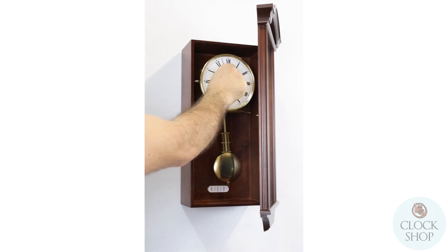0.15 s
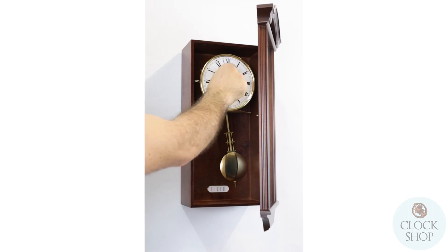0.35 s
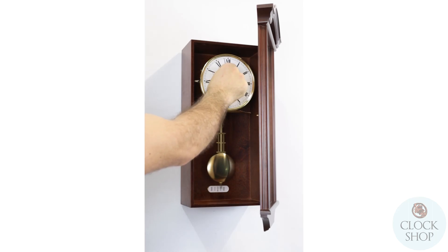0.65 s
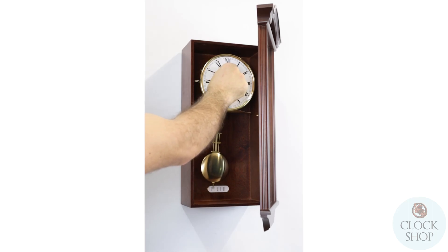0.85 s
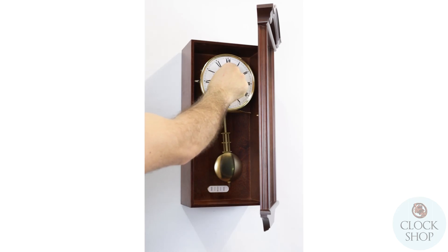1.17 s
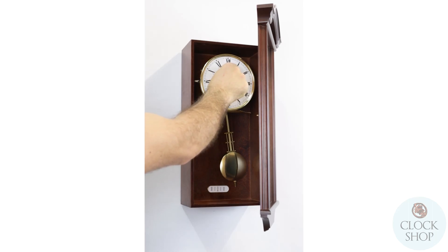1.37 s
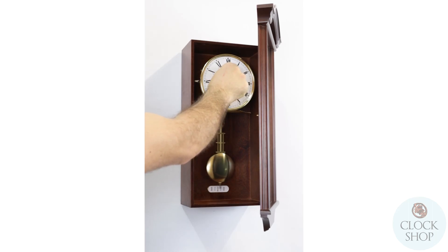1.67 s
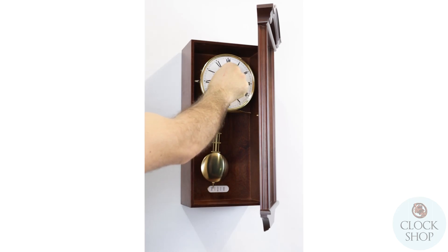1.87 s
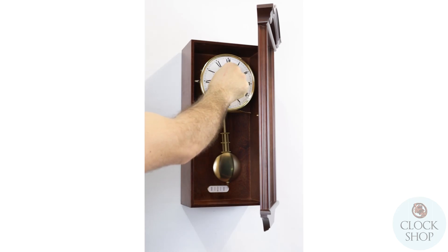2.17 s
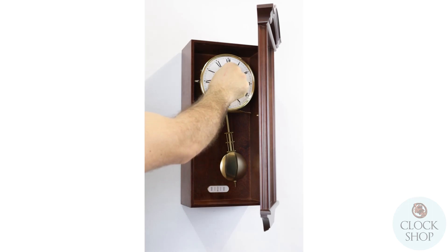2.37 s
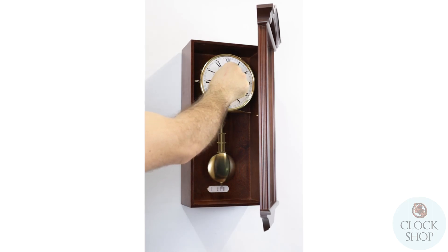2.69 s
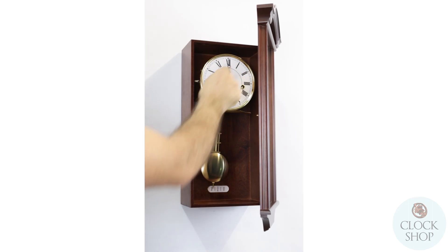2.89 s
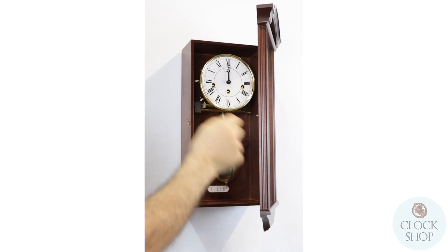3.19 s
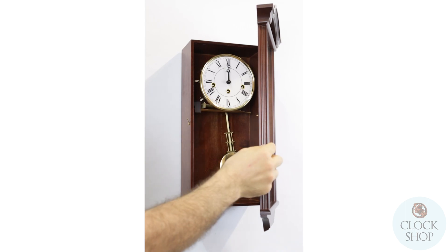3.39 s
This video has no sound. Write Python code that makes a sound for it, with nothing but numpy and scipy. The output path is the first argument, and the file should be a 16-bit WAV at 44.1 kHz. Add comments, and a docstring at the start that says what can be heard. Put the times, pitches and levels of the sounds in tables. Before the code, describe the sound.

A mechanical wall clock's slow tick-tock, two sharp clacks, then a rising rasping gear whir

```python
"""A quiet room with hiss, rumble and a low wavering drone holds a pendulum clock in an open wooden case.
Each escapement beat is a chattering blow that rings damped modes, with a crack and a wash of noise.
Fingers nudge the minute hand (swelling resonant noise), and chime rods hum as narrow bands of noise.
A lever slips and lands with two clacks, and the gear train spins up to a whir of rasping teeth."""
import sys
import numpy as np
from scipy import signal
from scipy.fft import rfft, irfft
from scipy.io import wavfile

SR = 44100
rng = np.random.default_rng(int(sys.argv[2]) if len(sys.argv) > 2 else 0)


def waveform_to_disk(signal):
    """Save audio, clipped to [-1, 1], as 16-bit WAV at the path in sys.argv[1]."""
    frames = np.transpose(np.atleast_2d(signal))
    scaled = np.clip(frames, -1, 1) * 32767
    samples = np.round(scaled).astype(np.int16)
    wavfile.write(sys.argv[1], SR, samples)


def to_linear_factor(level_db):
    """Convert decibel levels (scalar or array-like) to linear amplitude factors."""
    exponent = np.asarray(level_db, float) / 20
    return 10 ** exponent


N = 156114  # length [samples]
ONSET_S = .01  # onset of the rod hums and of the gear train [s]


def evened(x):
    """Normalization of power: scales to an rms of 1."""
    return x / np.sqrt(np.mean(x ** 2) + 1e-20)


def add(mix, start_s, sound):
    """Superposition: sums a sound into the mix at start_s seconds."""
    part = mix[round(start_s * SR):][:len(sound)]
    part += sound[:len(part)]


def coloured(x, points):
    """Spectral shaping: weights x by a curve of (frequency [Hz], level [dB]), then sets its rms to 1."""
    curve_hz, curve_db = np.transpose(points)
    hz = np.fft.rfftfreq(len(x), 1 / SR)
    # straight lines over log frequency
    weight_db = np.interp(np.log(hz + 1), np.log(curve_hz), curve_db, -80, -80)
    return evened(irfft(rfft(x) * to_linear_factor(weight_db), len(x)))


def resonate(x, hz, width):
    """Simple resonance: one complex pole, of gain 1 at hz and the given width [Hz]."""
    pole = np.exp((2j * np.pi * hz - np.pi * width) / SR)
    return 2 * signal.lfilter([1 - abs(pole)], [1, -pole], x).real


def steep(x, hz, width):
    """Cascaded resonance: two equal passes steepen the skirts."""
    return resonate(resonate(x, hz, width), hz, width)


def fuzz(size, hz, width):
    """Narrow-band noise: a steep resonance driven by white noise, rms 1."""
    return evened(steep(rng.standard_normal(size), hz, width))


def body(x, peaks):
    """Modal superposition: steep resonances of alternating sign add up to a body, rms 1."""
    total = np.zeros(len(x))
    for k, (hz, width, db) in enumerate(peaks):
        total += (-1) ** k * to_linear_factor(db) * steep(x, hz, width)
    return evened(total)


def swell(level_db, swell_s, t60):
    """Envelope of friction: a smooth rise, then an exponential decay."""
    t = np.arange(SR // 3) / SR
    decay = to_linear_factor(level_db - 60 * np.maximum(t - swell_s, 0) / t60)
    return decay * np.minimum(t / swell_s, 1) ** .6


def blow(peak_db, modes, colour, bass_hz, rise_s, chatter_s, chatter_db, crack_db, crack_s, wash_db, wash_s):
    """Impact excitation: a click with chatter rings damped modes; a grainy crack and a case wash join."""
    vary_db, vary_pitch = 1.5, .007  # no two blows ring the modes alike
    t = np.arange(SR // 2) / SR
    chatter_noise, crack_noise, wash_noise = rng.standard_normal((3, len(t)))
    chatter = chatter_noise ** 3 * to_linear_factor(-60 * (t / chatter_s) ** 2)
    push = to_linear_factor(chatter_db) * chatter / np.linalg.norm(chatter) + (t == 0)

    ring = np.zeros(len(t))
    for hz, db, t60 in modes:
        u, v = rng.standard_normal(2)
        decay = to_linear_factor(db + vary_db * u - 60 * t / t60)
        ring += decay * np.sin(2 * np.pi * hz * (1 + vary_pitch * v) * t)
    ring = signal.fftconvolve(push, ring)[:len(t)]
    ring /= np.linalg.norm([to_linear_factor(db) for _, db, _ in modes])

    crack = coloured(crack_noise * abs(crack_noise), colour) * to_linear_factor(crack_db - 60 * t / crack_s)
    wash = coloured(wash_noise * np.sqrt(abs(wash_noise)), colour)
    wash = signal.lfilter(*signal.butter(1, 9000, fs=SR), wash)  # the case softens the treble
    wash *= to_linear_factor(wash_db - 60 * t / wash_s)

    sound = to_linear_factor(peak_db) * (ring + crack + wash) * np.minimum(t / rise_s, 1) ** 2
    return signal.lfilter(*signal.butter(2, bass_hz, "high", fs=SR), sound)


def room():
    """Stationary noise and a modulated tone: steady hiss and rumble under a drone that swells."""
    # spectrum of the hiss and rumble: (frequency [Hz], level [dB])
    noise_colour = [(55, -30), (74, 0), (190, -6), (380, -14), (700, -21), (2200, -33), (4000, -34),
                    (5500, -39), (12500, -41), (15800, -50)]
    # rms level of the drone: (time [s], level [dB])
    drone_level = [(0, -56), (.78, -57), (.89, -47), (.97, -62), (1.05, -48), (1.18, -61), (1.32, -49),
                   (1.62, -44.5), (1.77, -58), (1.87, -53), (2, -63), (3.12, -64), (3.24, -43), (3.36, -42),
                   (3.44, -66)]
    drone_hz, noise_db = 45.8, -59.3
    t = np.arange(N) / SR
    level = np.sqrt(2) * to_linear_factor(np.interp(t, *np.transpose(drone_level)))
    drone = level * np.sin(2 * np.pi * drone_hz * t)
    return drone + to_linear_factor(noise_db) * coloured(rng.standard_normal(N), noise_colour)


def chime_rods():
    """Lightly damped vibration: rods set humming sound as faint, uneven, decaying narrow bands."""
    # hums: (time [s], frequency [Hz], level [dB], t60 [s])
    hums = [(1.29, 781, -58, .5), (1.28, 4600, -65, .4), (2.32, 781, -59, .8), (2.718, 781, -50, .17)]
    out = np.zeros(N)
    t = np.arange(SR // 2) / SR
    for start_s, hz, db, t60 in hums:
        envelope = to_linear_factor(db - 60 * t / t60) * (1 - np.exp(-t / ONSET_S))
        add(out, start_s, envelope * fuzz(len(t), hz, 45))
    return out


def fingers():
    """Friction excitation: soft nudges on the dial, short rubs and a woody knock as resonant noise."""
    # nudges: (time [s], level [dB], swell [s], fade t60 [s])
    nudges = [(.541, -50, .025, .15), (1.616, -55, .03, .2)]
    # resonances, one list for each nudge: (frequency [Hz], width of each pass [Hz], level [dB])
    nudge_peaks = [
        [(614, 120, -0.5), (1170, 120, -5), (3030, 350, -9)],
        [(398, 70, 3), (1370, 200, -12.5), (2870, 120, -14)],
    ]
    # rubs and knock: (time [s], centre [Hz], width of each pass [Hz], level [dB], swell [s], fade t60 [s])
    rubs = [(1.205, 1000, 1800, -59, .015, 1.2), (1.27, 720, 400, -53, .012, .3),
            (2.462, 1700, 1100, -50, .022, .1), (3.09, 9000, 4000, -64, .02, .15)]
    out = np.zeros(N)
    for (start_s, *shape), peaks in zip(nudges, nudge_peaks):
        rub = to_linear_factor(-9) * fuzz(SR // 3, 1800, 1600)  # broad noise under the resonances
        resonant = body(rng.standard_normal(SR // 3) ** 3, peaks)
        add(out, start_s, swell(*shape) * (rub + resonant))
    for start_s, hz, width, *shape in rubs:
        add(out, start_s, swell(*shape) * fuzz(SR // 3, hz, width))
    return out


def gears():
    """Periodic impact excitation: teeth rasp into the movement's plates as the train gathers speed."""
    # speed of the train: (time [s], tooth rate [teeth/s])
    tooth_rate = [(2.64, 50), (2.78, 92), (3.1, 164), (3.54, 232)]
    # gains of the whir: (time [s], level [dB], treble relative to it [dB])
    whir = [(2.635, -64, -28), (2.87, -58, -23), (3.07, -54.5, -17), (3.54, -55.5, -11)]
    # spectrum of the lower part: (frequency [Hz], level [dB])
    low_colour = [(650, -24), (1080, 0), (1500, -11), (1880, -5), (2150, -10), (2570, 0), (3440, 0),
                  (4500, -11), (5200, -30)]
    # treble resonances: (frequency [Hz], width of each pass [Hz], level [dB])
    high_peaks = [(6400, 1400, -1), (8000, 2500, -1), (11300, 1200, -0.5), (12800, 700, 2),
                  (15000, 1300, -4)]
    jitter, uneven_db = .1, 2.5  # spread of tooth timing [tooth periods] and of strength [dB]
    t = np.arange(N) / SR
    rate = np.interp(t, *np.transpose(tooth_rate))

    # a tooth falls wherever the running count of teeth passes its jittered number
    late, strength = rng.standard_normal((1000, 2)).T
    count = np.cumsum(rate * (t > tooth_rate[0][0]) + 1e-6) / SR - 1e-3
    places = np.interp(np.arange(1000) + jitter * late, count, np.arange(N), right=0).astype(int)
    teeth = np.zeros(N)
    teeth[places] = to_linear_factor(uneven_db * strength)

    drive = []
    # lower part, then treble: decay time of a tooth's rasp [s], steady scrape at full speed
    for tooth_s, scrape in ((.004, 1.5), (.0015, 1.3)):
        rasp = signal.lfilter([1], [1, -np.exp(-1 / (tooth_s * SR))], teeth) / np.sqrt(rate * tooth_s)
        drive.append((rasp + scrape * rate / rate.max()) * rng.standard_normal(N))

    whir_s, db, high_db = np.transpose(whir)
    low = to_linear_factor(np.interp(t, whir_s, db)) * coloured(drive[0], low_colour)
    high = to_linear_factor(np.interp(t, whir_s, db + high_db)) * body(drive[1], high_peaks)
    return (low + high) * np.clip((t - whir_s[0]) / ONSET_S, 0, 1)


def lever():
    """Impact and rebound: the lever slips off with one clack, then lands with another and bounces."""
    # landing and bounces: (time [s], level [dB])
    landing = [(2.5375, -29.5), (2.5425, -32), (2.554, -31), (2.5635, -33)]
    # modes rung by the slip: (frequency [Hz], level [dB], t60 [s])
    slip_modes = [(800, -3, .06), (1055, 1, .06), (1287, -1, .07), (2650, -3, .04), (3200, -8, .05),
                  (5346, -13, .1), (9388, -12, .04)]
    # modes rung by the landing: (frequency [Hz], level [dB], t60 [s])
    landing_modes = [(398, -3, .14), (1071, -2, .1), (1911, -10, .08), (3117, -6, .08), (3246, -8, .08),
                     (6589, -17, .06), (8759, -15, .07)]
    # spectrum of crack and wash: (frequency [Hz], level [dB])
    noise_colour = [(200, -35), (400, -5), (720, -4), (1100, 0), (3200, -7), (9000, -13), (15800, -25)]
    # strike: (rise [s], chatter t60 [s], chatter [dB], crack [dB], crack t60 [s], wash [dB], wash t60 [s])
    strike = (.0015, .03, 2, 2, .025, -8, .16)
    bass_hz = 250  # little sound below this
    out = np.zeros(N)
    add(out, 2.4885, blow(-23, slip_modes, noise_colour, bass_hz, *strike))
    for start_s, db in landing:
        add(out, start_s, blow(db, landing_modes, noise_colour, bass_hz, *strike))
    return out


def escapement():
    """Modal ringing under impact: tick and tock alternate, with one light graze just before a beat."""
    # beats, tick and tock in turn: (time [s], level [dB])
    beats = [(.251, -39), (.717, -38), (1.268, -39.5), (1.7415, -41.5), (2.296, -40.5), (2.766, -43),
             (3.321, -44.5)]
    # modes of the tick: (frequency [Hz], level [dB], t60 [s])
    tick = [(880, -3, .12), (1281, -4.5, .08), (1728, 2.5, .08), (2164, 0, .08), (3596, -2, .06),
            (4027, -4, .06)]
    # modes of the tock: (frequency [Hz], level [dB], t60 [s])
    tock = [(1281, -8.5, .08), (1809, -3, .07), (2175, -7, .08), (3150, -4, .05), (3510, -5, .08),
            (3900, -8, .11), (4000, -5, .13)]
    # spectrum of crack and wash: (frequency [Hz], level [dB])
    noise_colour = [(500, -28), (900, -4), (2000, -1), (4200, -1), (5200, -10), (15800, -20)]
    # strike: (rise [s], chatter t60 [s], chatter [dB], crack [dB], crack t60 [s], wash [dB], wash t60 [s])
    strike = (.0028, .03, 5, 5, .03, -5.5, .18)
    bass_hz = (500, 1300)  # tick and tock hold little under this
    out = np.zeros(N)
    for k, (start_s, db) in enumerate(beats):
        add(out, start_s, blow(db, (tick, tock)[k % 2], noise_colour, bass_hz[k % 2], *strike))
    add(out, 1.263, blow(-48, tock, noise_colour, 2 * bass_hz[1], *strike))  # the graze
    return out


def scene():
    """Linear superposition of room and clock in one channel."""
    mix = room() + chime_rods() + fingers() + gears() + lever() + escapement()
    return mix[None]


def top_cut(x):
    """Nothing passes above the cut-off."""
    return signal.sosfilt(signal.butter(12, 16110, fs=SR, output="sos"), x)


def record(dry):
    """Passes on the finished mix, which is the dry scene with no further acoustics."""
    return top_cut(dry)


dry = scene()
out = record(dry)
waveform_to_disk(out)
```